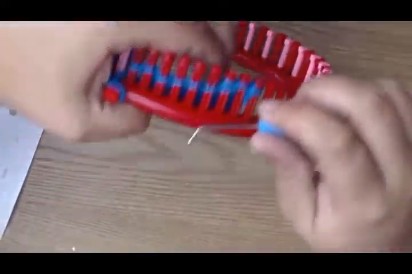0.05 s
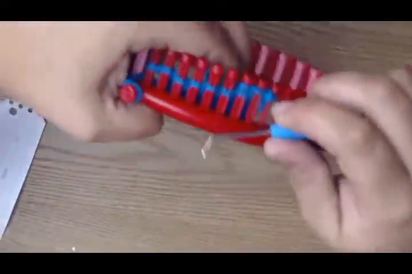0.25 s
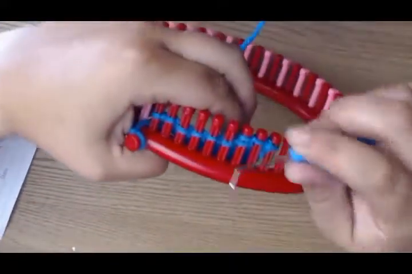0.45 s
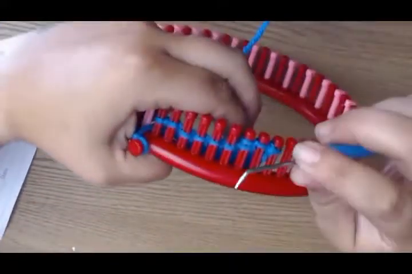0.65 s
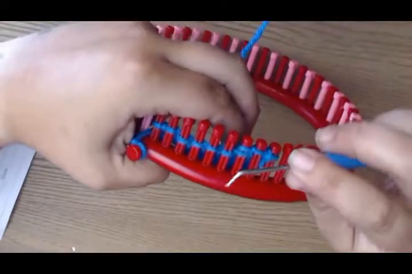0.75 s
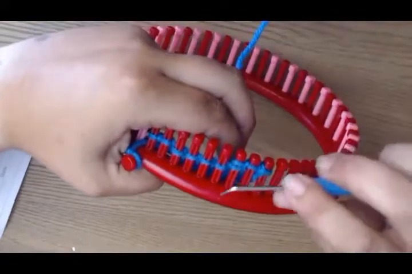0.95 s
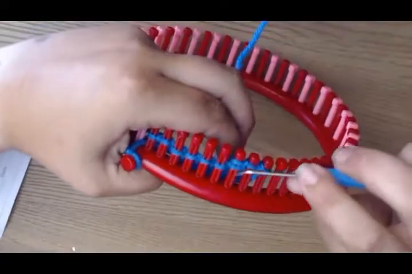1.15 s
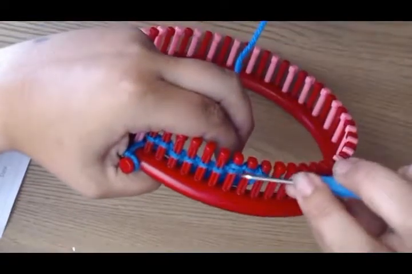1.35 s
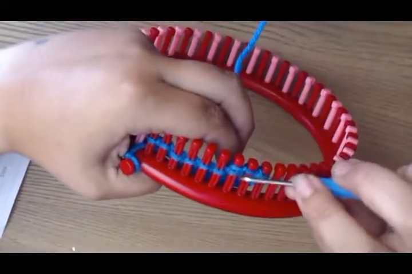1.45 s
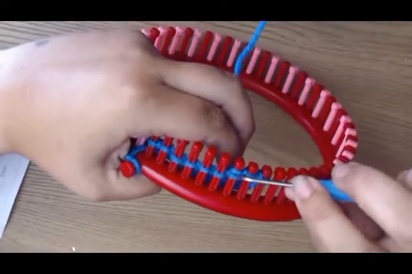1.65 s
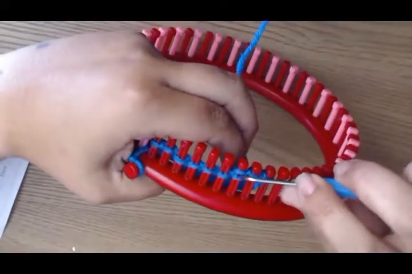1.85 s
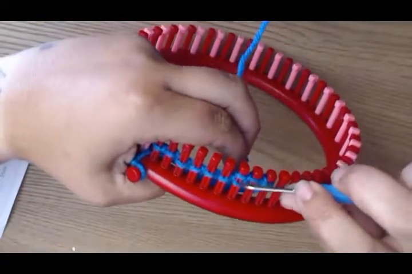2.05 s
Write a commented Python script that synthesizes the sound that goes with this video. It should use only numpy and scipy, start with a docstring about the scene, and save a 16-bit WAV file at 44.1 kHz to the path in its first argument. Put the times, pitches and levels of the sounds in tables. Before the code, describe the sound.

Close by, a plastic loom is shoved briefly over a wooden tabletop: a light tap, a quick cluster of booming knocks with a rasp, then softer bumps. Afterwards only faint yarn rustling and quiet room hum remain.

```python
"""A plastic knitting loom is shoved across a wooden table: it judders, clacks and settles in soft bumps. Each
contact rings the table's modes, so the wood booms. The sliding rim catches and slips on the grain and rasps.
Faint rustles of yarn come before and after. Behind it all are a quiet room's air and a wavering hum, and a thin
electrical whine pulses throughout."""
import sys
import numpy as np
from scipy import signal
from scipy.fft import rfft, irfft
from scipy.io import wavfile
from scipy.ndimage import uniform_filter1d

SR = 44100
rng = np.random.default_rng(int(sys.argv[2]) if len(sys.argv) > 2 else 0)


def unload_audio(sound):
    """Save the sound as a 16-bit wav file, at the path given as the first command line argument."""
    columns = np.transpose(np.atleast_2d(sound))
    # keep every value between -1 and 1, then stretch to whole-number steps
    steps = np.round(np.clip(columns, -1, 1) * 32767)
    wavfile.write(sys.argv[1], SR, steps.astype(np.int16))


N = 92610
T = np.arange(N) / SR


# Loom and hand on the table. Each row: peak time in seconds, relative level in dB,
# softness (pulse sigma) in ms, left minus right in dB.
KNOCKS = [(0.0308, -23.5, 0.81, 4), (.0515, -31, .6, 9), (0.058, -31.5, 0.67, -3),
          (0.0702, -45, 0.074, 10.5), (0.2067, -16.5, 0.81, 9.5), (0.2217, -9.5, .6, 10),
          (0.2287, -2.5, 0.51, -1.5), (0.243, -4, 0.267, 12), (0.246, -3.5, 0.098, 8),
          (0.2565, -12, 0.2, 14.5), (0.2621, -10.5, 0.073, -4.5), (0.267, -24, 0.52, -13.5),
          (0.2785, -7.5, 0.54, 1.5), (0.3027, -6.5, 0.43, 1), (0.3262, -20, .7, -5.5), (.348, -10, 1.3, -2),
          (0.3786, -22.5, 0.39, -0.5), (.433, -19.5, 1.02, 0.5), (0.443, -21.5, 0.71, 5),
          (0.476, -25, 0.59, 0), (0.513, -17.5, 1.03, -6.5), (1.089, -41, 1, -4), (1.9844, -43, 0.54, 6),
          (2.0052, -33, 0.57, 3), (2.064, -31, 0.53, 10.5)]

def knocks(gain_db=-6.5):
    """Each contact is one smooth push on the table; the softer it is, the duller the thump."""
    force = np.zeros((2, N))
    for peak_s, db, soft_ms, pan_db in KNOCKS:
        push = np.exp(-.5 * ((T - peak_s) * 1000 / soft_ms) ** 2)
        force += pan(pan_db) * amp(db) * push / push.sum()
    return amp(gain_db) * tabletop(force)


# Modes of the table under the loom. Each entry: frequency in Hz.
MODE_HZ = [134, 175, 198, 243, 271, 322, 440, 495, 561, 672, 699, 760, 965, 1285]
# The same modes. Each entry: relative level in dB.
MODE_DB = [-15.5, -3.5, -0.5, -6, -6.5, -9, -21, -5.5, -13, -15, -12.5, -20, -28, -25.5]

def tabletop(force, t60_at_200_hz_s=0.14):
    """The wood rings in its modes, hardly radiates below them and soaks up the treble."""
    t = T[:SR // 2]
    ring = np.zeros(len(t))
    for hz, db in zip(MODE_HZ, MODE_DB):
        t60_s = t60_at_200_hz_s * (hz / 200) ** -0.34
        ring += amp(db - 60 * t / t60_s) * np.sin(2 * np.pi * hz * t)
    ring = butterworth(ring, "highpass", hz=126, order=7)
    ring = butterworth(ring, "lowpass", hz=2130, order=2)
    return signal.fftconvolve(force, ring[None], axes=1)[:, :N]


# Spectrum of plastic scraping wood. Each row: frequency in Hz, relative gain in dB.
SCRAPE_SPECTRUM = [(400, -13.5), (650, 1), (1000, 11), (1400, -11), (1900, 4), (2800, -12), (3800, -13),
                   (5500, -17.5), (6600, -51.5), (7800, -56.5)]

def slide(start_s=.22, full_s=.245, ease_s=.295, stop_s=.338, rasp_gain_db=-33.5, boom_gain_db=-38):
    """The rim catches and slips on the grain: it rasps and shakes the table's upper modes."""
    pressure_db = np.interp(T, [start_s, full_s, ease_s, stop_s], [-25, 0, -2.5, -25])
    pressure = amp(pressure_db) * ((T > start_s) & (T < stop_s))
    grain = slips()
    mid = unit_rms(colour(grain, SCRAPE_SPECTRUM))
    side = unit_rms(colour(slips(), SCRAPE_SPECTRUM))
    rasp = butterworth(pressure * stereo(mid, side, width=0.082), "lowpass", hz=5900, order=8)
    shake = butterworth(pressure * grain, "highpass", hz=394, order=2)
    boom = tabletop(pan(db=2.5) * shake)
    return amp(rasp_gain_db) * rasp + amp(boom_gain_db) * boom


def slips(rate_per_s=3000, spread_db=2.5):
    """Stick-slip friction: a dense train of tiny impacts of uneven size."""
    size = amp(spread_db * np.minimum(rng.exponential(1, N), 3))
    hits = rng.random(N) < rate_per_s / SR
    return unit_rms(hits * rng.choice([-1, 1], N) * size)


# Hard hits of the rim. Each row: start in seconds, relative level in dB.
CLACKS = [(0.2445, -14), (0.26, 0.5), (0.2595, -3), (0.265, -6), (0.2818, 4.5), (0.281, -2),
          (0.3082, -11.5)]
# Spectrum of struck plastic. Each row: frequency in Hz, relative gain in dB.
PLASTIC_SPECTRUM = [(100, -51), (500, -11.5), (1000, -5.5), (2000, -0.5), (3000, -4.5), (4000, -14),
                    (6000, -21.5), (7500, -36)]

def clacks(t60_s=0.018, gain_db=-18.5):
    """Hard plastic contacts: fast-dying cracks of noise, a little different at each ear."""
    envelope = np.zeros(N)
    for start_s, db in CLACKS:
        age_s = np.maximum(T - start_s, 0)
        envelope += (T >= start_s) * amp(db - 60 * age_s / t60_s)
    mid, side = (colour(envelope * rng.standard_normal(N), PLASTIC_SPECTRUM) for _ in range(2))
    return amp(gain_db) * stereo(mid, side, width=.3)


def tap(start_s=.0685, hz=740, db=-38.5, t60_s=0.041):
    """One light hollow tap of the loom: a single damped mode."""
    age_s = np.maximum(T - start_s, 0)
    return amp(db - 60 * age_s / t60_s) * np.sin(2 * np.pi * hz * age_s)


# Envelope of the hands' rumble. Each row: time in seconds, level in dB.
HAND_RUMBLE = [(0, -41), (.09, -49), (.14, -71.5), (.3, -35), (.4, -36.5), (.48, -46), (.58, -57.5),
               (1.12, -59.5), (1.35, -64), (1.95, -69), (2.1, -60.5)]

def hand_rumble():
    """Leaning hands keep the table's low modes faintly astir."""
    force = butterworth(rng.standard_normal((1, N)), "lowpass", hz=260, order=3)
    envelope = amp(np.interp(T, *np.transpose(HAND_RUMBLE)))
    return envelope * unit_rms(tabletop(force))


# Yarn rustles. Each row: peak time in seconds, length in seconds, centre in Hz, level in dB.
RUSTLES = [(0.057, 0.033, 5020, -59.5), (0.06, 0.025, 6500, -59.5), (.43, .05, 4170, -67.5),
           (0.48, 0.03, 3700, -71.5), (0.506, 0.031, 3780, -63), (.86, .06, 5670, -70.5),
           (0.941, 0.056, 3860, -72), (0.957, 0.049, 5500, -72), (1.633, 0.034, 4050, -65),
           (1.69, 0.027, 3650, -68), (1.84, 0.041, 5740, -72.5), (1.931, 0.079, 3900, -73.5),
           (1.936, 0.041, 5500, -75)]

def yarn(half_width_ratio=0.1):
    """Rubbing yarn gives short swells of narrow-band hiss."""
    hz = np.fft.rfftfreq(N, 1 / SR)
    rustles = np.zeros(N)
    for peak_s, length_s, centre_hz, db in RUSTLES:
        band = 1 / np.sqrt(1 + ((hz / centre_hz - 1) / half_width_ratio) ** 4)
        swell = np.exp(-2 * ((T - peak_s) / length_s) ** 2)
        rustles += amp(db) * swell * band_noise(band)
    return rustles


# Room decay. Each row: frequency in Hz, T60 in seconds.
ROOM_T60 = [(100, 0.1), (450, 0.39), (1000, 0.057), (6000, 0.11)]

def reverb(x):
    """The room's short diffuse tail; the low mids ring longest."""
    hz, t, spectra = signal.stft(rng.standard_normal((2, SR // 2)), SR, nperseg=256)
    decay = amp(-60 * t / interp_log_hz(ROOM_T60, hz)[:, None])
    _, tail = signal.istft(spectra * decay, SR, nperseg=256)
    return signal.fftconvolve(x, tail / np.linalg.norm(tail[0]), axes=1)[:, :N]


# Spectrum of the room's air. Each row: frequency in Hz, relative gain in dB.
AIR_SPECTRUM = [(15, -90.5), (25, -69), (65, -20.5), (103, -11.5), (207, -8), (239, -13), (303, -3.5),
                (376, -10), (414, -6.5), (527, -12.5), (792, -12), (2280, -24.5), (3040, -29.5),
                (3770, -34.5), (6390, -40), (6860, -38.5), (7740, -43), (10100, -15.5), (17000, -120)]

def air(db=-57.5, correlation=.93):
    """Steady room noise, nearly alike at both ears."""
    mid, side = (unit_rms(colour(rng.standard_normal(N), AIR_SPECTRUM)) for _ in range(2))
    mid *= np.sqrt((1 + correlation) / 2)
    return amp(db) * stereo(mid, side, width=np.sqrt((1 - correlation) / 2))


# Tones of the room's hum. Each row: frequency in Hz, level before panning in dB.
HUM_TONES = [(118.4, -74), (177.6, -86), (209.9, -61), (312.2, -69.5), (786.0, -73)]

def hum(half_width_hz=3.8):
    """Very narrow noise bands, heard as tones that drift in level and phase."""
    hz = np.fft.rfftfreq(N, 1 / SR)
    tones = np.zeros(N)
    for centre_hz, db in HUM_TONES:
        band = 1 / (1 + ((hz - centre_hz) / half_width_hz) ** 2)
        tones += amp(db) * band_noise(band)
    return tones


def whine(hz=6820, db=-74, pulses_per_s=30, duty=0.32, pulse_centre_s=.028):
    """A thin electrical tone that pulses on and off."""
    offset_cycles = ((T - pulse_centre_s) * pulses_per_s + .5) % 1 - .5
    gate = (abs(offset_cycles) < duty / 2).astype(float)
    return amp(db) * uniform_filter1d(gate, size=60) * np.sin(2 * np.pi * hz * T)


def amp(db):
    """Decibels to gain."""
    return 10 ** (np.asarray(db) / 20)


def unit_rms(x):
    """Scales to RMS 1."""
    return x / np.sqrt(np.mean(x ** 2) + 1e-20)


def pan(db):
    """Channel gains for a left minus right level difference."""
    return amp([[db / 2], [-db / 2]])


def stereo(mid, side, width):
    """Mid and side to left and right."""
    return mid + width * np.array([side, -side])


def butterworth(x, kind, hz, order):
    """Causal Butterworth filter."""
    return signal.sosfilt(signal.butter(order, hz, kind, fs=SR, output="sos"), x)


def band_noise(band):
    """Noise of RMS 1, shaped by one gain per FFT bin."""
    return unit_rms(irfft(rfft(rng.standard_normal(N)) * band, N))


def interp_log_hz(points, hz):
    """Interpolates (Hz, value) rows on a log-frequency axis."""
    point_hz, values = np.transpose(points)
    return np.interp(np.log(hz + 1), np.log(point_hz + 1), values)


def colour(x, spectrum):
    """Minimum-phase filter with the given (Hz, dB) response."""
    hz = abs(np.fft.fftfreq(4096, 1 / SR))
    log_gain = np.log(amp(np.maximum(interp_log_hz(spectrum, hz), -100)))
    response = np.exp(np.conj(signal.hilbert(log_gain)))
    return signal.fftconvolve(x, np.fft.ifft(response).real)[:N]


def scene(reverb_db=-22.5):
    """The loom on the table with its reverb, then yarn and a quiet background."""
    loom = knocks() + slide() + clacks() + pan(db=1) * (tap() + hand_rumble())
    foreground = loom + amp(reverb_db) * reverb(loom) + yarn()
    background = pan(db=3) * air() + pan(db=6.5) * hum() + whine()
    return foreground + background


def record(dry, cutoff_hz=7750):
    """The microphone's band limit."""
    lowpass = signal.firwin(301, cutoff_hz, window=("kaiser", 8), fs=SR)
    return signal.oaconvolve(dry, lowpass[None], "same")


dry = scene()
out = record(dry)
unload_audio(out)
```